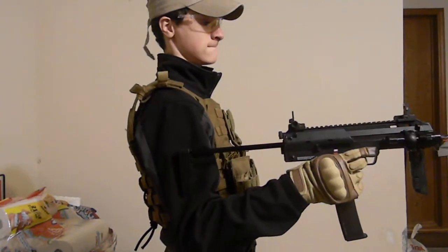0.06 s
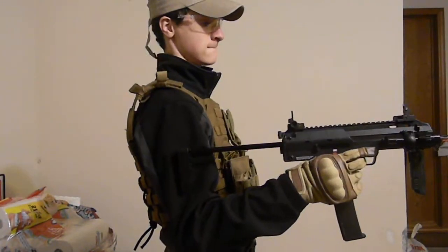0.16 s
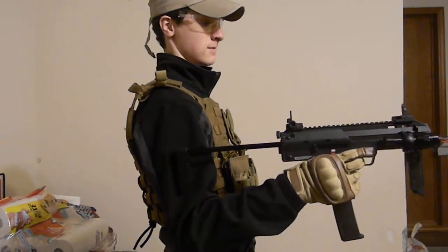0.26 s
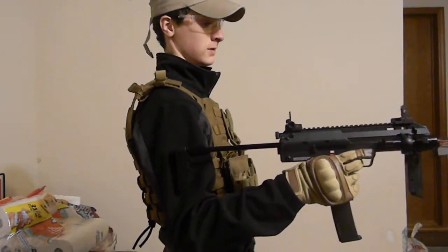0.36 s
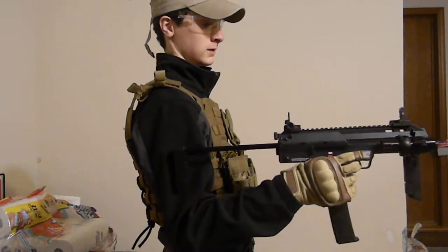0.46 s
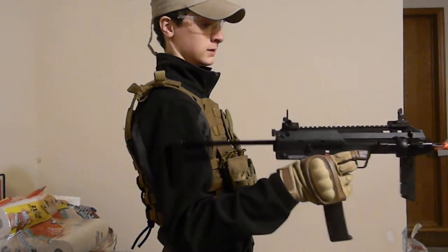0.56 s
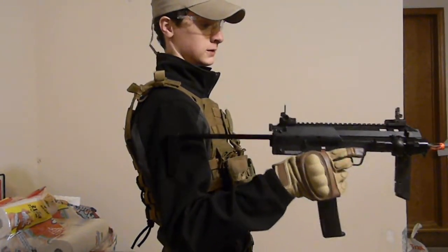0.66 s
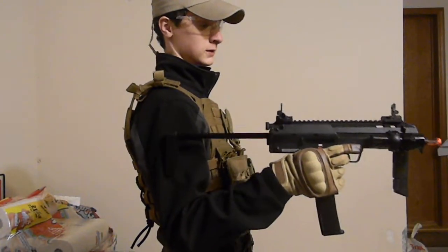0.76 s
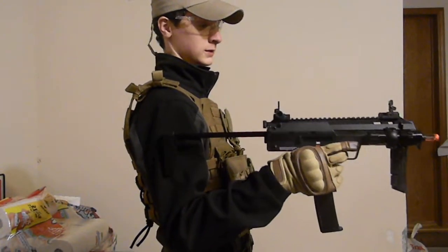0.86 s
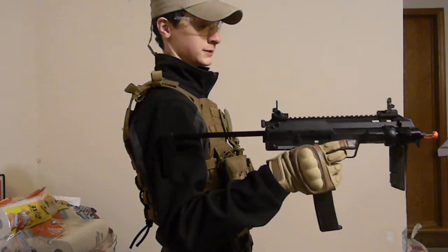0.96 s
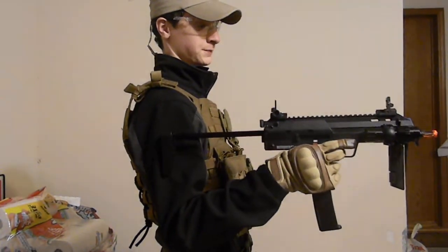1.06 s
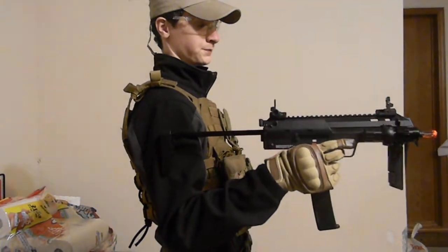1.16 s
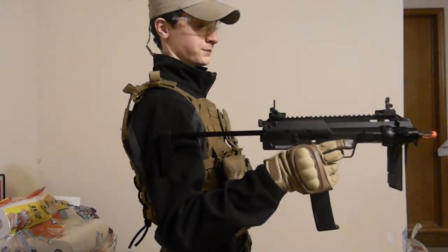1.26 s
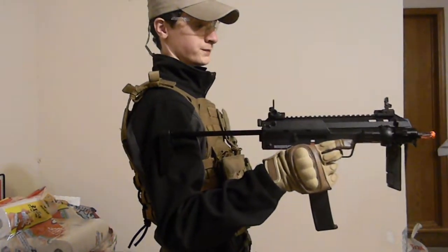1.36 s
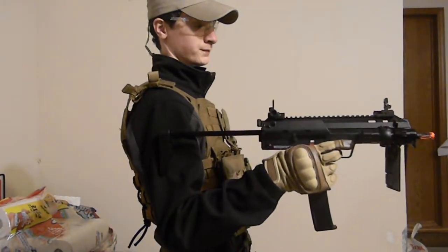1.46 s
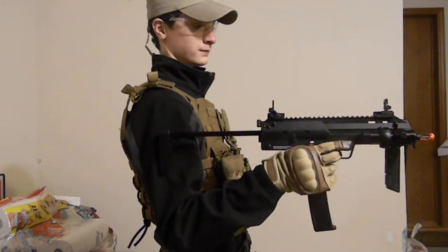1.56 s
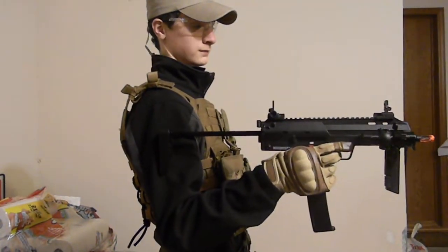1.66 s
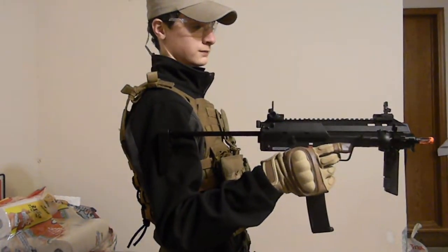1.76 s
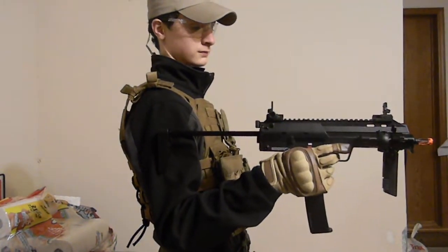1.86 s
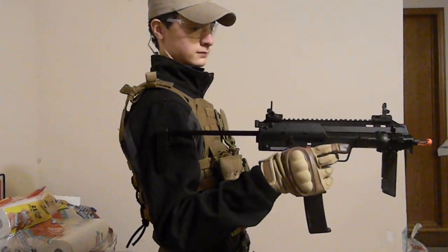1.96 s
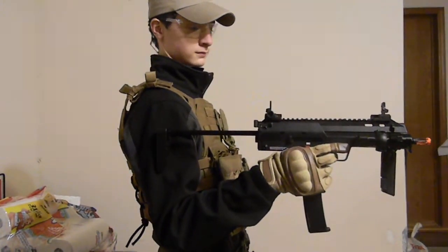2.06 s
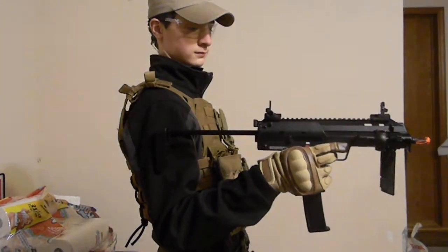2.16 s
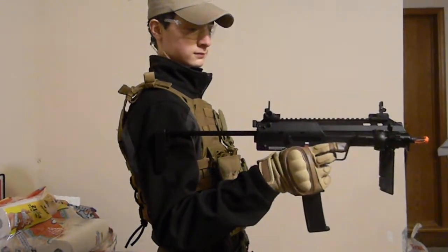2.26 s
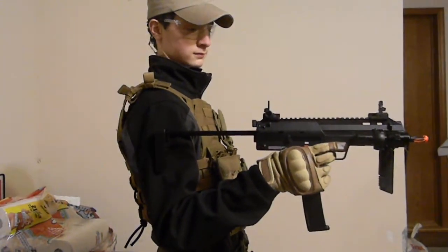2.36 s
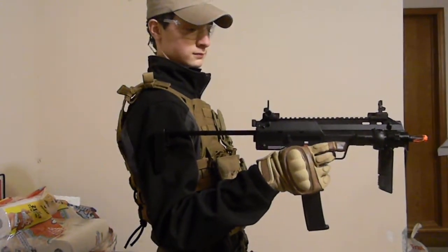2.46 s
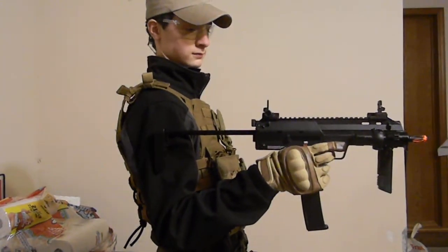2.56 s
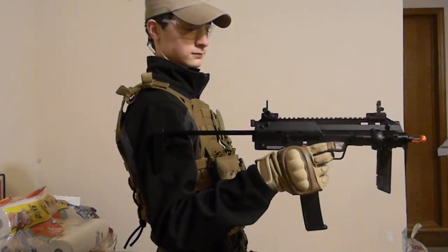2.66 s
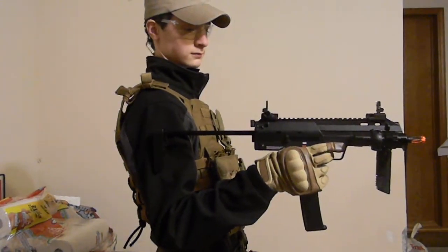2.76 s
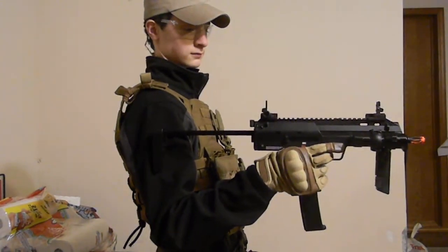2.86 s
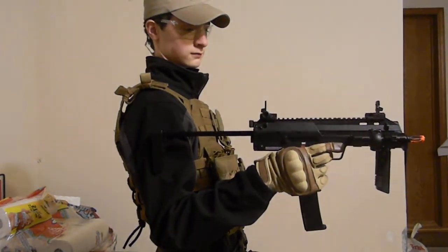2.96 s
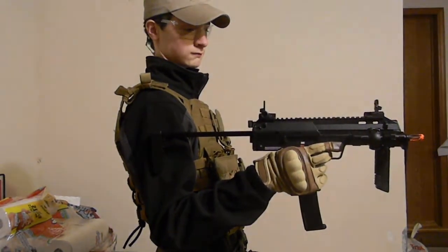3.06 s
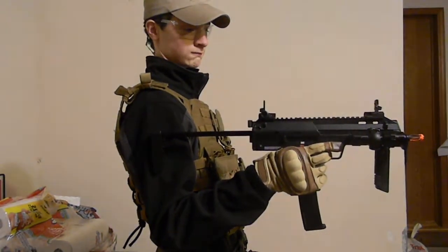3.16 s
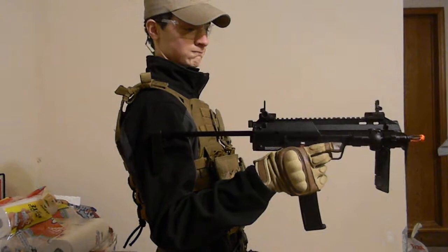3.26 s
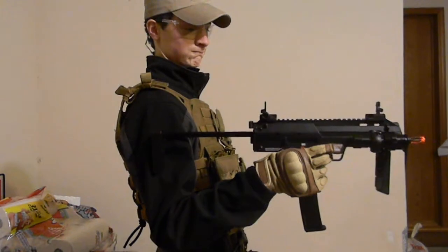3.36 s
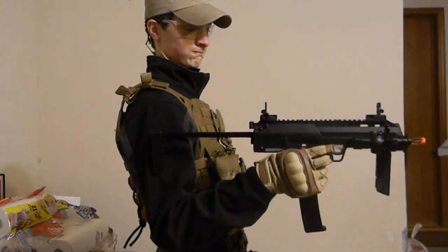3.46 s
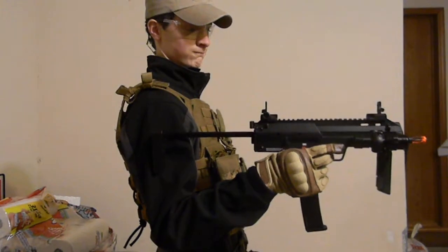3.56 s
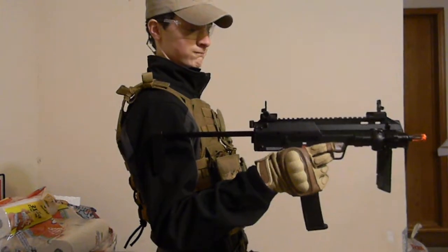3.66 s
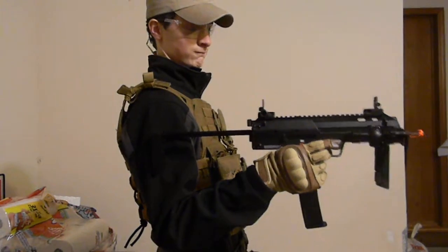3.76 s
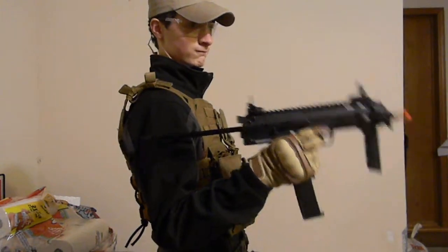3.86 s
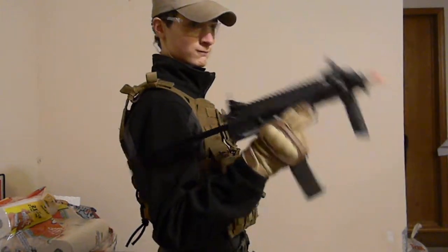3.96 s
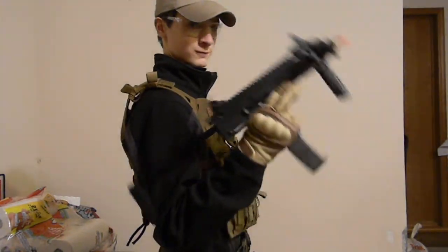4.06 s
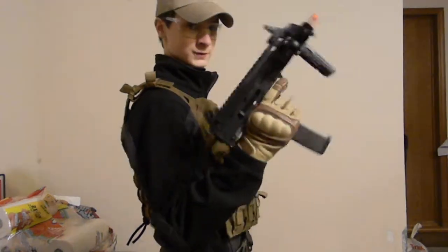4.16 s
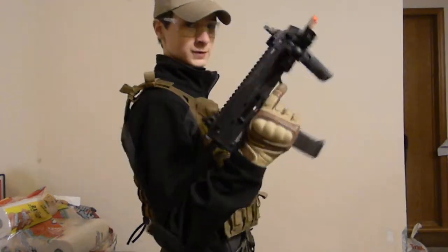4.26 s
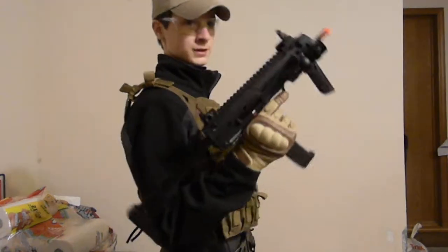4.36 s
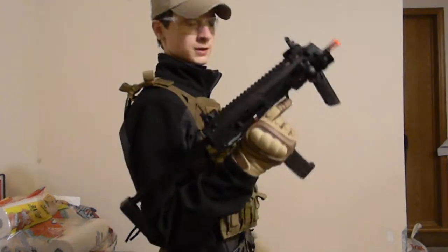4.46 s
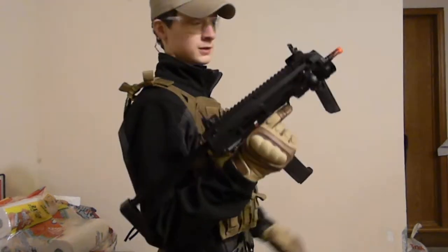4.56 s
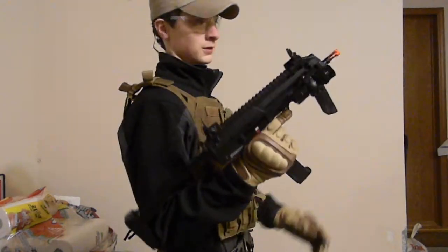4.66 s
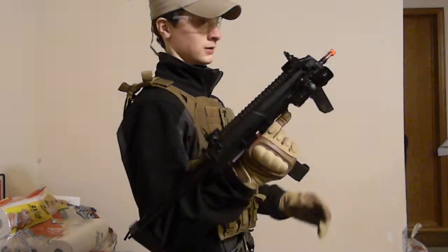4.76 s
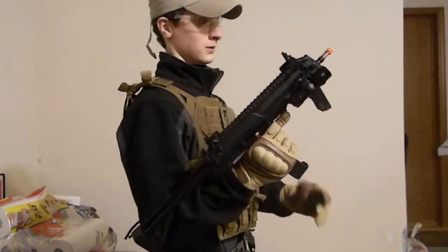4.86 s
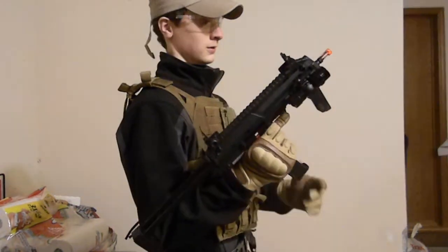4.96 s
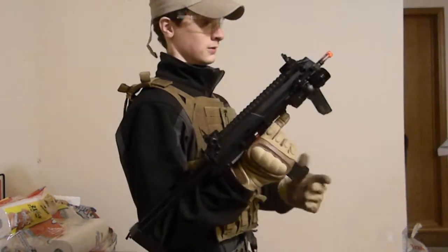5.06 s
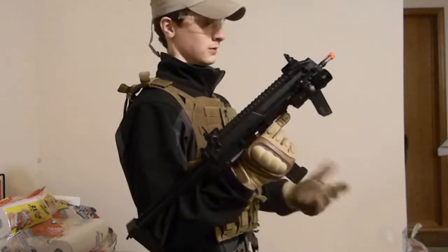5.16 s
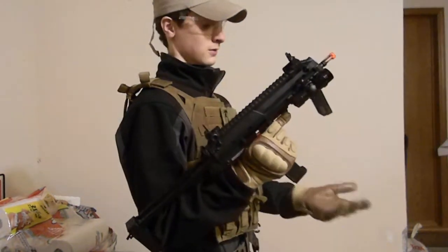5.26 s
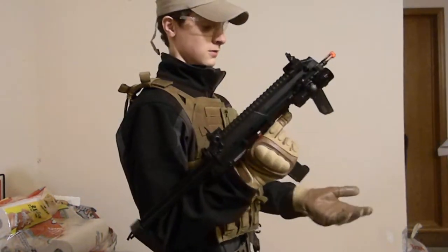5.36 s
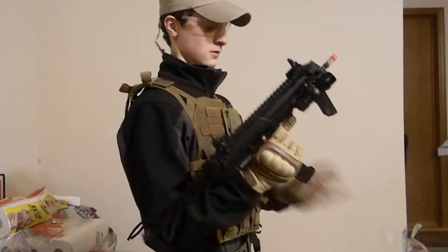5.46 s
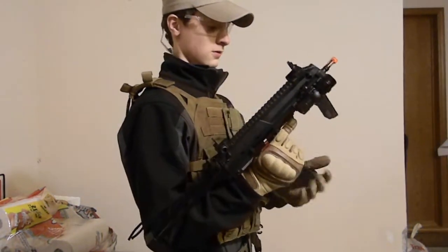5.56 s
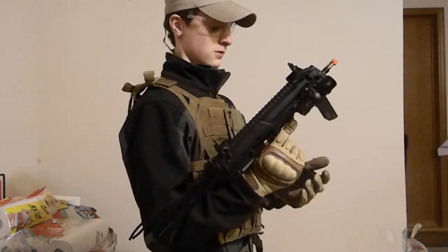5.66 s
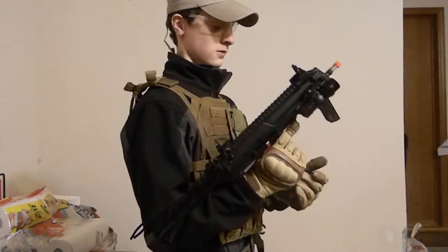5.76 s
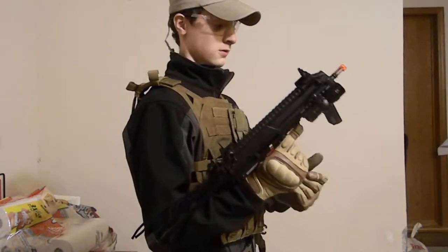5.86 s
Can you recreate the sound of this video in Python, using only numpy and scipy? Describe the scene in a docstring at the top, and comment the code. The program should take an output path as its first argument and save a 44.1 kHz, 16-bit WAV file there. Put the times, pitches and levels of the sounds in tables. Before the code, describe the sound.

An airsoft submachine gun rattles off one long automatic burst in a bare room, rings out, then gear rustles and a gloved hand slaps it.

```python
"""A gas airsoft submachine gun empties its magazine in a bare room, near a camera.
Each cycle is a dull puff at the muzzle, a hard clack of the bolt and a latching click, made of shaped noise and ringing tones.
Echoes and standing waves answer; gain control holds the gun down, and the room swells as the gain recovers.
Gear rustles while the gun is raised and a gloved hand slaps the magazine, over a low hum and camera hiss."""
import sys
import numpy as np
from scipy import signal
from scipy.fft import rfft, irfft
from scipy.io import wavfile
from scipy.ndimage import uniform_filter1d

SR = 44100
rng = np.random.default_rng(int(sys.argv[2]) if len(sys.argv) > 2 else 0)


def transcribe(u):
    """Save the signal u as a 16-bit wav file named by the first command-line argument.

    u: samples, shape (n,) or (channels, n), limited to [-1, 1]; the rate is SR.
    q: integer samples, one column per channel.
    """
    v = np.clip(np.atleast_2d(u).T, -1, 1)
    q = np.round(v * 32767).astype(np.int16)
    wavfile.write(sys.argv[1], SR, q)


N = 260057
LEAD = SR // 2  # samples of run-up, cut off later: the burst is already under way
TOTAL = N + LEAD


# The shots; levels are relative, and the delay from puff to slam shrinks late on as the stroke weakens:
# (puff time [s], puff level [dB], low thump level [dB], slam time [s], slam level [dB])
SHOT_CYCLES = [(0.0449, 7.5, 4.5, 0.0819, 5), (0.1107, 6, 5.5, 0.1481, 3.5), (0.1765, 7.5, 5, 0.2152, 2.5),
               (0.2432, 5, 4, 0.2832, 3.5), (0.3117, 7.5, -13, 0.3524, 1.5), (0.38, 5.5, 4.5, 0.4208, 3.5),
               (0.449, 4, 3, 0.4903, 0), (0.519, 3.5, 2, 0.5614, 2), (0.589, 4, 3.0, 0.6327, 1),
               (0.6607, 5, 5, 0.7049, 2.5), (0.7335, 5, 4, 0.7765, 2.5), (0.804, 5, 6.5, 0.8498, 2.5),
               (0.878, 5.5, -4, 0.9249, 4.5), (0.954, 4.5, 4, 0.9997, 4), (1.0289, 7, 4.5, 1.0737, 3.5),
               (1.1036, 4.5, 0, 1.149, 2.5), (1.1787, 5, 4, 1.223, 1), (1.2521, 4, 3, 1.2966, 2.5),
               (1.3265, 4.5, 2.5, 1.3698, 1), (1.4, 0.5, 0, 1.4432, 1.5), (1.4727, 3.5, 2, 1.5167, 2),
               (1.5465, 4, -0.5, 1.5898, 0.5), (1.6206, 2, 1, 1.6618, 1), (1.6929, 2, 1, 1.7329, 1),
               (1.763, 2, -0.5, 1.8033, -1.5), (1.837, 0.5, 0.5, 1.8735, 1.5),
               (1.9041, 3.5, 3.5, 1.9426, 3), (1.975, 4.5, 3, 2.0117, 4), (2.044, 4, 2, 2.0804, 1),
               (2.1119, 5, 2.5, 2.1484, 1), (2.1808, 4, 3, 2.216, -2.5), (2.25, 1, -1.5, 2.2843, 0.5),
               (2.32, 0.5, 0, 2.3532, 0), (2.388, 0.5, 2.5, 2.4205, 0.5), (2.4575, 1.5, 0.5, 2.4846, 0),
               (2.5198, -0.5, -2, 2.5482, -1), (2.586, -2, 2, 2.6138, -1.5),
               (2.6539, -7.5, 0.5, 2.6805, -1.5), (2.7178, 0, -1, 2.7459, -0.5),
               (2.784, -0.5, 1, 2.8123, -1), (2.8522, -1.5, -1, 2.879, -0.5), (2.9248, -2, 2, 2.9501, -0.5),
               (2.9814, -0.5, -1, 3.007, 1.5), (3.0547, -2, 0, 3.0794, 2), (3.1255, -1, 1.5, 3.1498, 2),
               (3.191, 1, -2.5, 3.2146, 1), (3.256, -4, 2.5, 3.2798, 1.0), (3.3261, 1.5, 3.5, 3.3494, 2.5)]


def burst(count=6):
    """Lists every shot, with copies of the opening one placed earlier, in the run-up."""
    first = np.array(SHOT_CYCLES[0])
    gap = SHOT_CYCLES[1][0] - first[0]
    earlier = [first - k * gap * np.array([1, 0, 0, 1, 0]) for k in range(count, 0, -1)]
    return earlier + SHOT_CYCLES


# Colour of the spitting gas: (frequency [Hz], level [dB per Hz])
GAS_COLOUR = [(60, -54), (120, -25), (260, -22), (500, -20), (720, -13), (920, -4), (1080, -12),
              (1400, -11), (3000, -39), (8000, -32), (16000, -33)]
# First echoes of the puff: (delay [s], left level [dB], right level [dB], brightness [dB per octave])
PUFF_ECHOES = [(0, 8.5, 6, 2.5), (.0056, 6, -6, 3.5), (.0099, -0.5, -6, 1), (0.0253, -8, -12.5, 2.5),
               (.0341, 0, -9, 2)]
# The gas cools as the magazine empties and the pop gets lower: (time [s], factor on pitch [-])
COOLING = [(0, 0.85), (1.5, 0.83), (2.4, 0.84), (3.4, 0.71)]
# The hoot of the barrel sinks too: (time [s], frequency [Hz], relative level [dB])
BARREL_HOOT = [(0, 986, -2), (1.3, 979, 0.5), (2.35, 947.5, 3), (2.7, 904, 3), (3.3, 899, 0)]
# How hard each shot drives the low standing wave: (time [s], level [dB])
LOW_WAVE_LEVEL = [(0, 1), (.55, 2), (.75, 0), (.9, -1), (1.25, -7), (1.45, -7), (1.65, -8), (2.2, -12),
                  (2.32, 1), (2.5, -5.5), (2.65, -10), (3.3, -5.5)]


def muzzle(shots, level_db=19, warm_pop_hz=565, pop_s=0.0016, snap_db=-12, snap_s=.0001, gas_db=-10,
           barrel_t60=0.86, barrel_db=-12, wet_db=-3.5, standing_db=-2.0):
    """A snap, a short pressure wave, a spit of gas and a barrel hoot; pops pump the room's standing waves."""
    dry, kicks, low_kicks, hoot = np.zeros((4, TOTAL))
    near = np.zeros((2, TOTAL))
    snap_lead_s = 0.002487  # the first snap of gas runs ahead of the pressure wave
    half = SR // 200
    t, long = np.arange(-half, half) / SR, np.arange(SR) / SR
    snap = unit_energy(np.exp(-(t / snap_s) ** 2))
    when, *barrel = np.transpose(BARREL_HOOT)
    for s, db, thump_db, _, _ in shots:
        pop_hz = warm_pop_hz * np.interp(s, *np.transpose(COOLING))
        swell = np.exp(-((t + .0003) / pop_s) ** 2)
        pop = unit_energy(np.cos(2 * np.pi * pop_hz * t) * swell)
        gas = amp(gas_db) * blow(GAS_COLOUR, 0, crack_s=0.0005, rattle_db=1.5, rattle_s=0.034)
        for start, sound in (s - half / SR, pop), (s - snap_lead_s, gas):
            add(near, start, amp(db) * reflections(sound, PUFF_ECHOES, sway_s=.00005))
            add(dry, start, amp(db) * sound)
        # strong puffs snap disproportionately hard
        add(near, s - snap_lead_s - half / SR, amp(2 * db + snap_db) * amp([[-9], [0]]) * snap)
        barrel_hz, hoot_db = (np.interp(s, when, curve) for curve in barrel)
        tone = np.sin(2 * np.pi * (barrel_hz * long + rng.random()))
        add(hoot, s, amp(hoot_db) * unit_energy(tone * amp(-60 * long / barrel_t60)))
        add(kicks, s, amp([thump_db]))
        add(low_kicks, s, amp([np.interp(s, *np.transpose(LOW_WAVE_LEVEL))]))
    near[1] = np.roll(near[1], -round(0.00015 * SR))  # the muzzle is nearer the right port
    standing = boom(kicks, ROOM_WAVES) + boom(low_kicks, LOW_WAVE)
    far = amp(wet_db) * room(dry, side_db=3.0, round_s=2.61)
    barrel_sound = amp(barrel_db) * amp([[-2], [1]]) * hoot
    return amp(level_db) * (near + barrel_sound + far + amp(standing_db) * standing)


# Colour of the bolt's clack: (frequency [Hz], level [dB per Hz])
CLACK_COLOUR = [(150, -12.5), (400, -14.5), (750, 0), (1200, -0.5), (2000, 0.5), (3100, -0.5), (4500, -1),
                (6500, -1), (8800, -1), (10800, -2), (12500, -11), (13800, -12.5), (15300, -6.5)]
# First echoes of the clack: (delay [s], left level [dB], right level [dB], brightness [dB per octave])
CLACK_ECHOES = [(0, -7.5, 0, 1), (.0018, -21, -2.5, -0.5), (.0063, -1, -9, 5.5), (.0091, 5, 2.5, 7),
                (0.0127, -13, -0.5, 0), (.0125, -13.5, -11, 2), (0.0193, 2.5, -9, 5.5)]
# As the stroke weakens, loose parts chatter less and the bolt lands less squarely:
# (time [s], chatter level against the crack [dB], crack length [s])
STROKE_WEAKENING = [(0, -3.5, 0.0017), (2.3, -5.5, .0009), (2.9, -14, .001), (3.1, -16, 0.0018)]
# The second, duller click of each cycle, as the action locks: (time [s], relative level [dB])
LATCH_CLICKS = [(0.0972, 2.5), (0.163, 0), (0.2308, 6.5), (0.2985, 5), (0.367, -4.5), (0.4342, -1.5),
                (0.5052, -4), (0.5768, -2), (0.6476, 5), (0.72, -1.5), (0.7911, 1.5), (0.8657, 3.5),
                (0.9412, 0.5), (1.0141, 1.0), (1.089, 2), (1.1646, 0.0), (1.2378, 3), (1.3115, 2),
                (1.3846, -4), (1.458, 0.5), (1.5318, -7), (1.6045, -5), (1.6769, -1), (1.747, 0),
                (1.8196, -4.5), (1.8877, 3), (1.9578, 4.5), (2.0267, 3), (2.0952, 5.5), (2.1634, 4),
                (2.2307, 2), (2.3, -4), (2.3674, 1), (2.4348, -2), (2.4984, -2), (2.5618, -1.5),
                (2.6305, -4), (2.6947, -1), (2.7597, -3.5), (2.8272, -4), (2.8942, -8), (2.9536, -6),
                (3.0215, -2), (3.083, -6), (3.1534, -6), (3.2179, -7), (3.282, 3), (3.3534, -3.5)]
# Colour of the latch: (frequency [Hz], level [dB per Hz])
LATCH_COLOUR = [(150, -7), (480, 0), (1000, -2.5), (2000, -2), (2700, 1.5), (4000, 0), (5500, -1.5),
                (8500, -3.5), (10800, -6.5), (12500, -19), (15300, -5)]
# First echoes of the latch: (delay [s], left level [dB], right level [dB], brightness [dB per octave])
LATCH_ECHOES = [(0, -8.5, 7.5, 0.5), (.0053, -4, 6, 2.5), (0.0128, -6.5, -13, 3)]


def bolt(shots, level_db=20.0, wet_db=5.0, brightness=-0.33, latch_db=-5.5):
    """Each slam of the bolt is a bright crack and rattle; the latch adds its own duller clicks."""
    dry, near = np.zeros(TOTAL), np.zeros((2, TOTAL))
    when, chatter_db, crack_s = np.transpose(STROKE_WEAKENING)
    for _, _, _, s, db in shots:
        length, chatter = np.interp(s, when, crack_s), np.interp(s, when, chatter_db)
        clack = amp(db) * strike(CLACK_COLOUR, brightness, length, chatter)
        add(near, s, reflections(clack, CLACK_ECHOES, sway_s=.00008))
        add(dry, s, clack)
    for s, db in LATCH_CLICKS:
        tick = amp(latch_db + db) * strike(LATCH_COLOUR, 0, crack_s=0.00042, rattle_db=-10)
        add(near, s, reflections(tick, LATCH_ECHOES, sway_s=.00008))
        add(dry, s, tick)
    return amp(level_db) * (near + amp(wet_db) * room(dry, side_db=-2.5))


# Ring of the receiver and barrel, before each blow varies it:
# (frequency [Hz], peak against the crack [dB], time to fall 60 dB [s])
GUN_RING = [(1460, -9.5, 0.011), (1500, -21.5, 0.044), (2270, -23, .05), (2503, -10.5, 0.028),
            (3050, -13.5, 0.02), (3240, -16, 0.066), (3630, -9.5, 0.024), (3820, -14, 0.033),
            (3943, -6, 0.074), (5140, -10, 0.018), (6540, -13, 0.029), (8210, -5.5, 0.082), (9120, -8, .1)]


def strike(colour, tilt, crack_s, rattle_db, vary_db=6.0, vary_tilt=0.3):
    """A crack rings the receiver; no two blows land alike, so each stirs the ringing tones differently."""
    t = np.arange(3000) / SR
    chance = rng.standard_normal(len(GUN_RING) + 1)
    ring = np.zeros(len(t))
    for (hz, db, t60), luck in zip(GUN_RING, chance):
        fading = amp(db + vary_db * luck - 60 * t / t60)
        ring += fading * np.cos(2 * np.pi * hz * t) * 2 * np.log(1000) / (t60 * SR)  # equal peaks
    crack = blow(colour, tilt + vary_tilt * chance[-1], crack_s, rattle_db, rattle_s=0.016)
    return crack + signal.fftconvolve(crack, ring)[:len(crack)]


def blow(colour, tilt, crack_s, rattle_db, rattle_s, even=0.72):
    """A brief crack, then loose parts chattering; the force feeds all pitches about evenly."""
    t = np.arange(3000) / SR
    crack, chatter = rng.standard_normal((2, len(t)))
    crack = unit_energy(crack * np.exp(-t / crack_s))
    chatter = unit_energy(chatter * abs(chatter) * np.exp(-t / rattle_s))  # squaring makes it spiky
    spectrum = rfft(crack + amp(rattle_db) * chatter, 2 * len(t))
    force = irfft(spectrum / uniform_filter1d(abs(spectrum), size=9) ** even)[:len(t)]
    return unit_energy(signal.fftconvolve(force, click(colour, tilt)))


# Knocks of hand and gear on the gun: (time [s], relative level [dB], brightness [dB per octave],
# length [s], thud of the grip against the knock [dB])
GUN_KNOCKS = [(4.166, -23, 1, .006, -16), (4.205, -21, 0, 0.0063, -18), (4.239, -30, -10, .006, -15),
              (4.449, -28, -1, .006, -15), (5.501, -17, -1.5, 0.0031, -20),
              (5.5048, -7, -3.5, 0.0056, -3.5), (5.5095, -5, 0, 0.0024, -11),
              (5.5148, -7.5, -2.5, .007, -14), (5.525, -9, -1.5, 0.0075, -14), (5.544, -13, -5, 0.011, -2),
              (5.59, -13, -3.5, .004, -3), (5.673, -21, -7, .005, -2), (5.884, -28, -5.5, 0.006, 0)]
# Colour of the knocks: (frequency [Hz], level [dB per Hz])
KNOCK_COLOUR = [(47, -39), (80, -18), (136, -12), (232, -19.5), (404, -3.5), (751, -5), (2430, -4.5),
                (4140, -13), (4730, -11.5), (7870, -22), (9400, -19), (16000, -47)]
# Cloth rubs as the arms raise the gun, steady it and reach for the magazine:
# (start time [s], rise [s], level [dB], fade [dB per s])
ARM_MOVES = [(3.851, 0.16, -47, 7), (4.15, 0.12, -54.5, 7), (5.4, 0.11, -45.5, 76)]
# Colour of the cloth: (frequency [Hz], level [dB per Hz])
CLOTH_COLOUR = [(100, -2), (300, -14), (440, 3), (720, -5), (950, -2), (1150, -9), (1500, -5.5), (2300, -6),
                (5000, -10), (9000, -11.5), (12000, -21), (16000, -17)]
# The stock scrapes over the vest as the gun comes up: (start time [s], rise [s], level [dB], fade [dB per s])
STOCK_SCRAPE = [(4.14, 0.035, -48.5, 93)]
# Colour of the scraped nylon: (frequency [Hz], level [dB per Hz])
NYLON_COLOUR = [(300, -25), (1100, -7), (1600, 1), (2600, -6), (3800, -12), (8000, -10), (16000, -28)]


def handling(level_db=5.5, wet_db=-4.5, standing_db=-18, thud_hz=450, thud_s=0.0026):
    """Sleeves and vest rub, and the hand knocks on the gun, whose hollow grip thuds."""
    dry, kicks = np.zeros((2, TOTAL))
    t = np.arange(SR // 10) / SR
    thud = unit_energy(np.sin(2 * np.pi * thud_hz * t) * t * np.exp(-t / thud_s))
    for s, db, tilt, length, thud_db in GUN_KNOCKS:
        knock = blow(KNOCK_COLOUR, tilt, crack_s=length, rattle_db=2.0, rattle_s=0.012)
        add(dry, s, amp(level_db + db) * knock)
        add(dry, s, amp(level_db + db + thud_db) * thud)
        add(kicks, s, amp([level_db + db + standing_db]))
    dry += rub(ARM_MOVES, CLOTH_COLOUR, grain_db=0.0, grain_size=300)
    dry += rub(STOCK_SCRAPE, NYLON_COLOUR, grain_db=6.0, grain_size=120)
    return dry + amp(wet_db) * room(dry, side_db=-5.0) + boom(kicks, ROOM_WAVES)


def rub(moves, colour, grain_db, grain_size):
    """Friction noise, made grainy by a random level, swells and fades with each movement."""
    t = (np.arange(TOTAL) - LEAD) / SR
    slow = unit_rms(uniform_filter1d(rng.standard_normal(TOTAL), size=grain_size))
    grain = amp(grain_db * slow)
    level = np.zeros(TOTAL)
    for s, rise, db, fade in moves:
        level += np.clip((t - s) / rise, 0, 1) * amp(db - fade * np.maximum(t - s - rise, 0))
    return level * unit_rms(noise(colour) * grain)


# How strongly the side of the gun beams each pitch along the first paths: (frequency [Hz], level [dB])
GUN_BEAM = [(400, -0.5), (1400, 0), (2400, 2), (3100, 7), (3700, 2), (4450, 0), (5250, 1), (6500, 0),
            (8400, 2), (11500, -4), (14000, -7.5), (20000, 0.5)]


def reflections(sound, paths, sway_s=.00018):
    """The straight path and the first bounces off wall, floor and door; they shift as the gun shakes."""
    response = np.zeros((2, 2048))
    for delay, left_db, right_db, tilt in paths:
        bounce = unit_energy(click(GUN_BEAM, tilt, size=256))
        at = abs(delay + (delay > 0) * sway_s * rng.standard_normal())  # the straight path stays put
        response[:, round(at * SR):][:, :len(bounce)] += amp([[left_db], [right_db]]) * bounce
    return signal.fftconvolve(sound[None], response, axes=1)


def room(x, side_db, round_s=1.1, count=4):
    """The shooter sways, so the sound passes slowly from one echo pattern to the next."""
    place = count * np.arange(TOTAL) / (round_s * SR)
    wet = np.zeros((2, TOTAL))
    for k in range(count):
        share = np.sin(np.pi / 2 * np.minimum((place - k) % count, 2))
        wet += convolve(x * share, tail())
    return wet * amp([[side_db / 2], [-side_db / 2]])


# Reverberation time, to fall 60 dB: (frequency [Hz], time [s])
ECHO_TIME = [(100, 0.43), (250, 0.89), (500, 0.76), (1400, 0.82), (3500, 0.81), (6000, 0.65), (9500, 0.45),
             (16000, 0.32)]


def tail(build_s=0.0095, same=0.5, wide_hz=480):
    """Dense random echoes build up, then die away at a rate set for each pitch, soonest in the high treble."""
    a, b, shared = rng.standard_normal((3, SR))
    pair = np.sqrt(1 - same) * np.array([a, b]) + np.sqrt(same) * shared
    hz, t, z = signal.stft(pair, SR, nperseg=512)
    z[1] += (z[0] - z[1]) / (1 + (hz[:, None] / wide_hz) ** 4)  # long waves reach both ports alike
    lead = read([(150, 0.14), (430, 1.8), (950, 1.08), (2500, 0.8)], hz)  # (frequency [Hz], phase [rad])
    z[1] *= np.exp(1j * lead)[:, None]  # the right port leads, most in the low mids
    fading = amp(-60 * t / read(ECHO_TIME, hz)[:, None])
    decay = signal.istft(z * fading, SR, nperseg=512)[1]
    build = 1 - np.exp(-(np.arange(decay.shape[1]) / SR / build_s) ** 2)
    return unit_energy(decay * build)


# Standing waves between the walls: (frequency [Hz], relative level [dB], time to fall 60 dB before the cap [s])
ROOM_WAVES = [(89.6, -16, 0.48), (165, 6, 0.13), (188.6, 11.5, 0.13), (228.5, 0, 0.31), (250.6, -11, 1.16),
              (297.1, -8.5, 0.6), (361.3, -8.5, 0.86), (385, -5, 0.94), (409, -7.5, 1.1), (441.5, -6, 1.02),
              (466.6, -6.5, 0.91), (498.5, -10, 0.92), (576, -20, 0.61), (616, -21, .7)]
# A low standing wave driven separately by the shots: (frequency [Hz], level [dB], time to fall 60 dB [s])
LOW_WAVE = [(134, 0, 0.59)]


def boom(kicks, modes, build_s=0.005, longest_t60=1.15):
    """Each push of air sets the standing waves of the room ringing."""
    t = np.arange(SR) / SR
    standing = np.zeros(SR)
    for hz, db, t60 in modes:
        standing += amp(db - 60 * t / min(t60, longest_t60)) * np.sin(2 * np.pi * hz * t)
    build = 1 - np.exp(-(t / build_s) ** 2)
    return amp([[0], [-2]]) * convolve(kicks, unit_energy(standing * build))


# Tones of the low hum, before low cut and gain control: (frequency [Hz], level [dB])
HUM_TONES = [(99.8, -66), (115.3, -60.5), (121.3, -57)]


def hum(waver=0.1):
    """Low tones close in pitch beat against each other while their level wavers slowly."""
    drift = noise([(0, 0), (6, 0), (14, -16), (40, -70), (200, -140)])  # (frequency [Hz], level [dB])
    t = np.arange(TOTAL) / SR
    tones = sum(amp(db) * unit_rms(np.sin(2 * np.pi * (hz * t + rng.random()))) for hz, db in HUM_TONES)
    return (1 + waver * drift) * tones


# Colour of the hiss: (frequency [Hz], level [dB per Hz])
HISS_COLOUR = [(15, -50), (25, -24), (84, -20), (117, -7.5), (145, -14.5), (229, -17), (309, -8),
               (988, -11.5), (1330, -13.5), (2110, -17.5), (2280, -30), (2550, -15.5), (3820, -26),
               (5880, -20.5), (9000, -24.5), (12000, -27), (16000, -28)]
# Likeness of the hiss at the two ears, before limiting to -1..1: (frequency [Hz], likeness [-])
HISS_LIKENESS = [(60, 0.22), (130, 1), (290, -0.92), (640, -1.4), (1410, -0.85), (3100, -0.8), (6820, 0.25),
                 (15000, 0.36)]
# Faint whines of the camera: (frequency [Hz], level [dB])
CAMERA_WHINES = [(2525, -62), (4167, -72), (4753, -78), (5330, -66), (5852, -72), (6368, -62),
                 (7957, -65.5), (8533, -67), (9017, -69), (9609, -70)]


def hiss(hiss_db=-44.0, whine_width_hz=55):
    """The camera's own steady noise, partly shared by the two ears, with narrow noise bands as fuzzy whines."""
    hz = np.fft.rfftfreq(TOTAL, 1 / SR)
    same = np.clip(read(HISS_LIKENESS, hz), -1, 1)
    left = noise(HISS_COLOUR)
    own = np.sqrt(1 - same ** 2) * rfft(noise(HISS_COLOUR))
    right = irfft(same * rfft(left) + own, TOTAL)
    peaks = np.zeros(len(hz))
    for centre, db in CAMERA_WHINES:
        peaks += amp(db) * unit_rms(np.exp(-.5 * ((hz - centre) / whine_width_hz) ** 2))
    whine = irfft(rfft(rng.standard_normal(TOTAL)) * peaks, TOTAL)
    return (amp(hiss_db) * np.array([left, right]) + whine)[:, LEAD:]


def amp(db):
    """Turns decibels into gain."""
    return 10 ** (np.asarray(db) / 20)


def unit_rms(x):
    """Scales a steady sound to an rms (average strength) of 1."""
    return x / np.sqrt(np.mean(x ** 2) + 1e-20)


def unit_energy(x):
    """Scales a short sound to energy 1, each channel by itself."""
    return x / np.sqrt(np.sum(x ** 2, axis=-1, keepdims=True) + 1e-20)


def read(points, hz):
    """Reads a table along a log-frequency axis."""
    f, value = np.transpose(points)
    return np.interp(np.log(hz + 1), np.log(f + 1), value)


def add(mix, s, sound):
    """Lays a sound into the mix at a time in seconds, counted from the end of the run-up."""
    part = mix[..., max(round(s * SR) + LEAD, 0):][..., :sound.shape[-1]]
    part += sound[..., :part.shape[-1]]


def convolve(x, response):
    """Passes a sound through a response of one or two channels."""
    return signal.fftconvolve(np.atleast_2d(x), np.atleast_2d(response), axes=1)[:, :TOTAL]


def click(colour, tilt=0, size=1024):
    """A short pulse of a given spectrum, tilted about 4 kHz, with its energy as early as possible."""
    hz = abs(np.fft.fftfreq(size, 1 / SR))
    octaves = np.log2(np.maximum(hz, 400) / 4000)
    log_gain = np.log(amp(read(colour, hz) + tilt * octaves))
    return np.fft.ifft(np.exp(np.conj(signal.hilbert(log_gain)))).real[:size // 2]  # minimum phase


def noise(colour):
    """Steady noise of a given spectrum."""
    hz = np.fft.rfftfreq(TOTAL, 1 / SR)
    return unit_rms(irfft(rfft(rng.standard_normal(TOTAL)) * amp(read(colour, hz)), TOTAL))


def scene():
    """Mixes gun, handling and hum, and cuts off the run-up."""
    gun_db, shots = 0.5, burst()
    gun = amp(gun_db) * (bolt(shots) + muzzle(shots))
    return (gun + handling() + hum())[:, LEAD:]


def record(dry, threshold_db=-21, recovery_db_per_s=67, slope=0.88, sense_s=0.0091, low_cut_hz=85,
           overload=.88, edge_hz=15900):
    """A low cut, gain control that drops fast and creeps back, hiss, overload and a treble limit."""
    dry = signal.sosfilt(signal.butter(3, low_cut_hz, "high", fs=SR, output="sos"), dry)
    power, keep = (dry ** 2).mean(0), np.exp(-1 / (sense_s * SR))
    smooth = signal.lfilter([1 - keep], [1, -keep], power, zi=[power[:SR // 10].mean()])[0]
    fall = recovery_db_per_s * np.arange(N) / SR
    # hold each loud moment, letting it sink at the recovery rate
    held_db = np.maximum.accumulate(10 * np.log10(smooth + 1e-12) + fall) - fall
    over_db = uniform_filter1d(np.maximum(held_db - threshold_db, 0), size=130)
    out = np.clip(dry * amp(-slope * over_db) + hiss(), -overload, overload)
    treble_limit = signal.firwin(511, edge_hz, window=("kaiser", 9), fs=SR)
    return signal.oaconvolve(out, treble_limit[None], "same")


dry = scene()
out = record(dry)
transcribe(out)
```